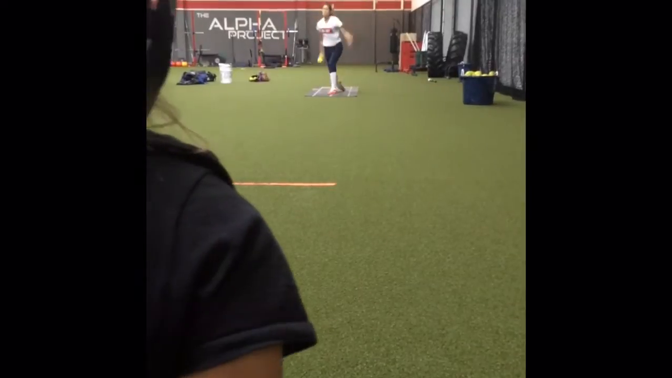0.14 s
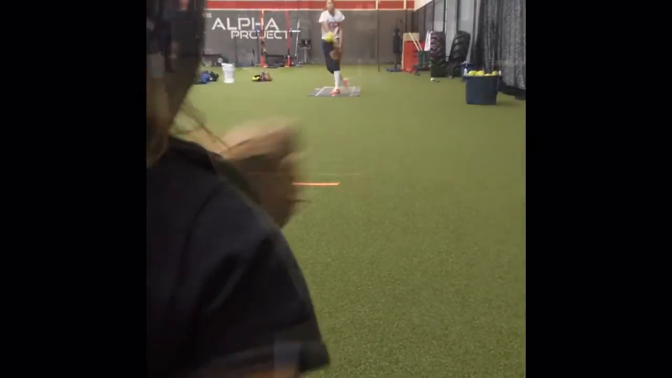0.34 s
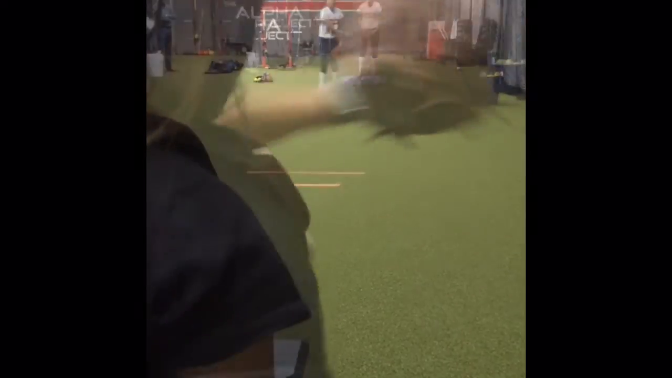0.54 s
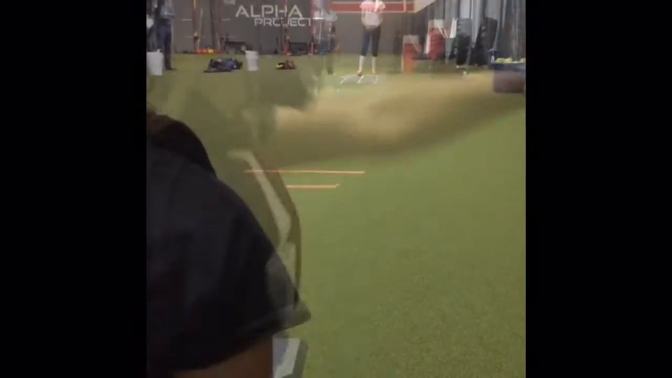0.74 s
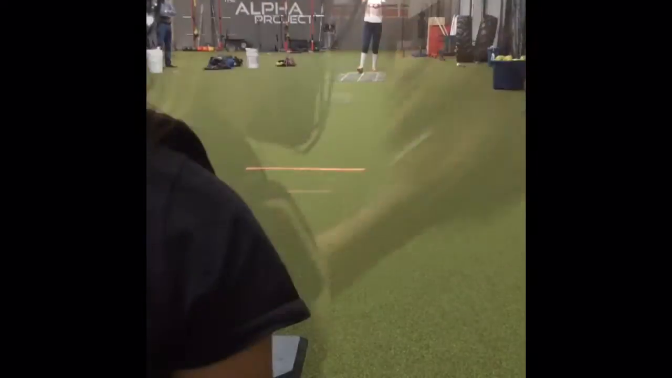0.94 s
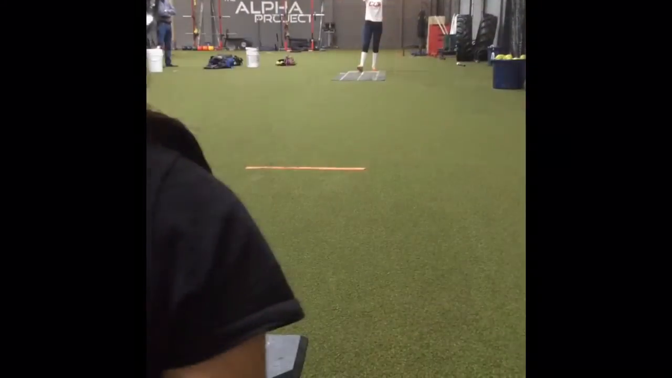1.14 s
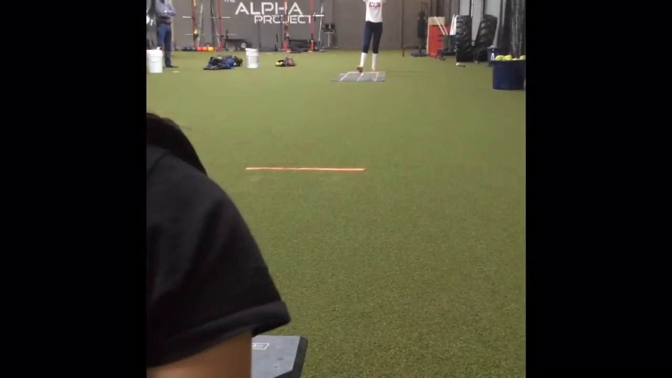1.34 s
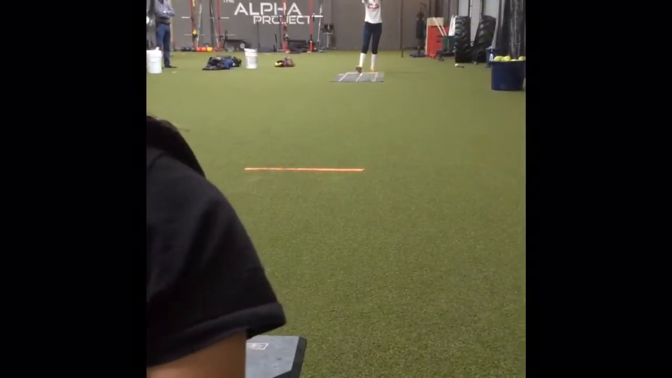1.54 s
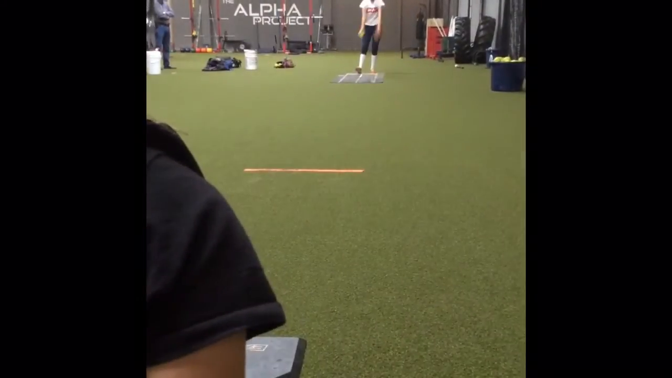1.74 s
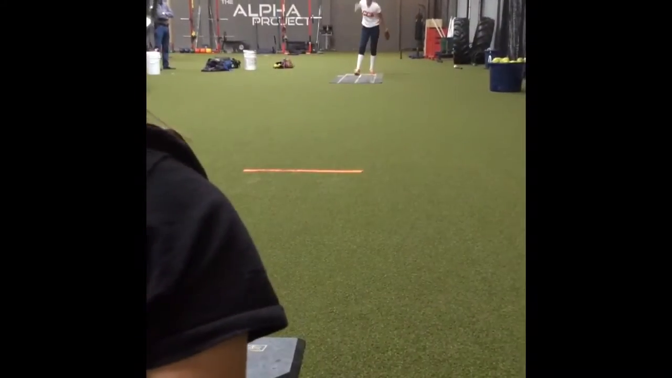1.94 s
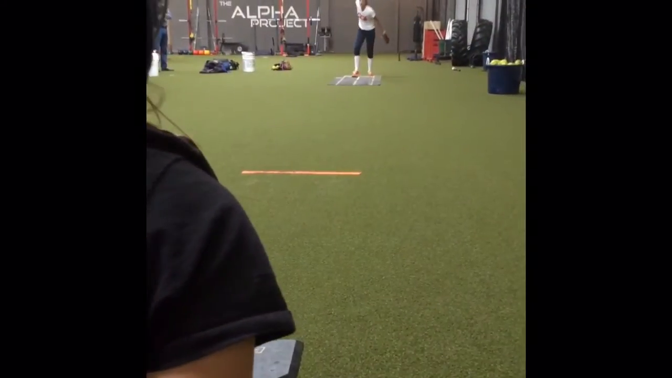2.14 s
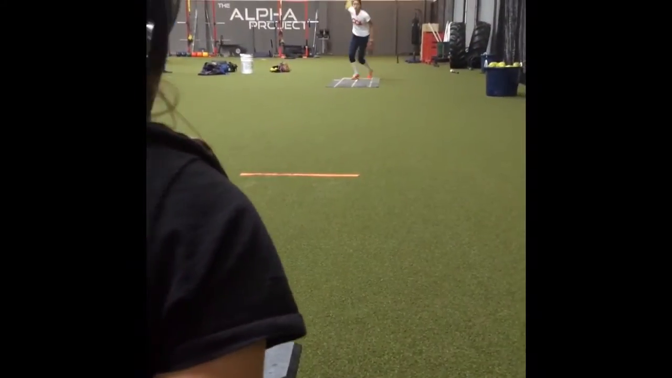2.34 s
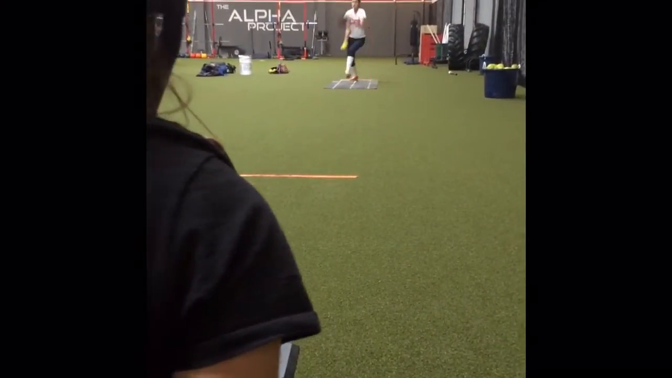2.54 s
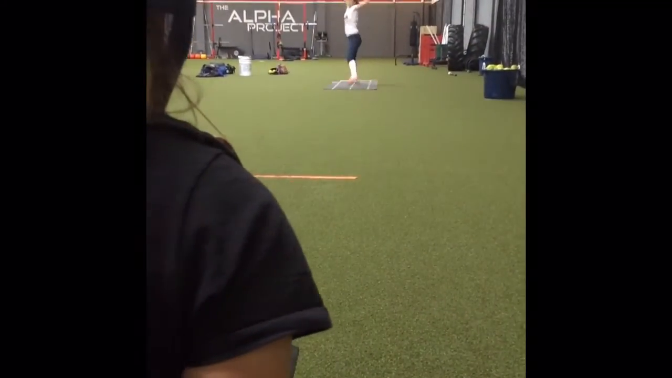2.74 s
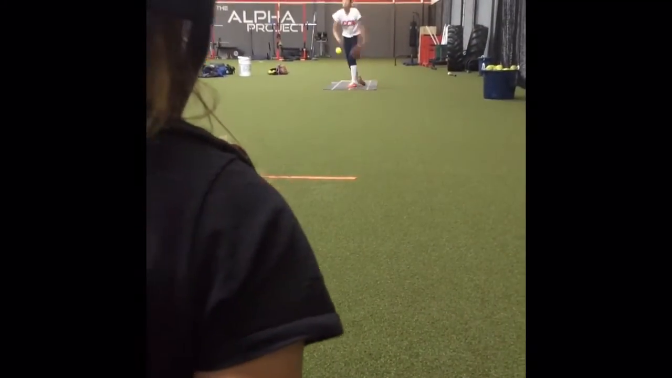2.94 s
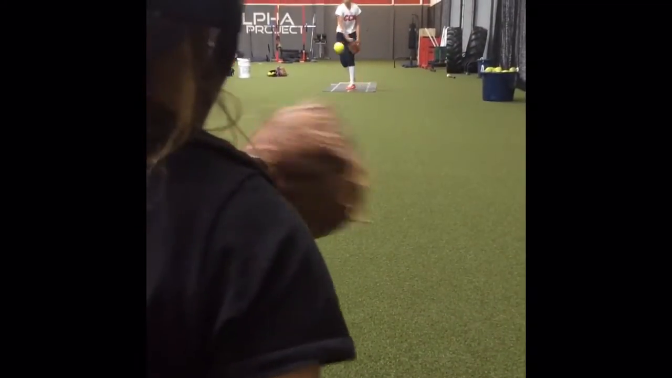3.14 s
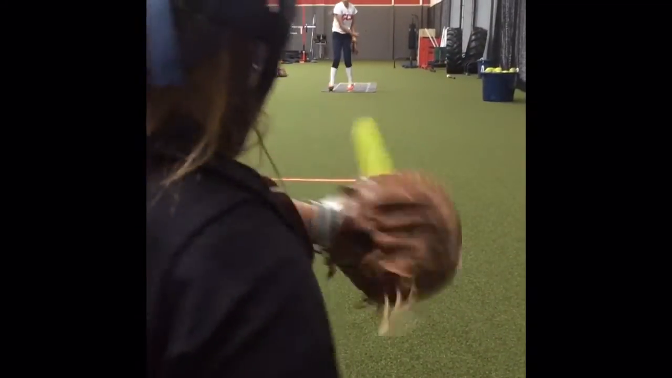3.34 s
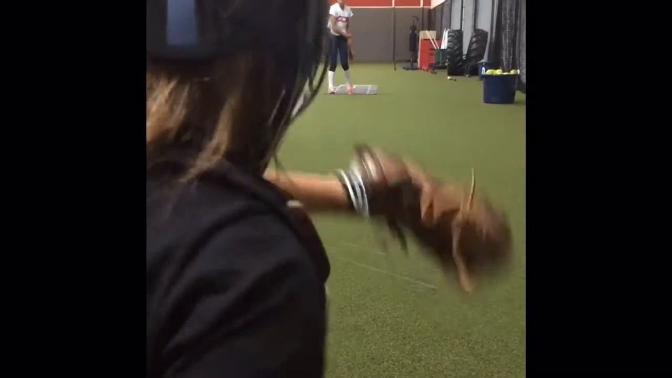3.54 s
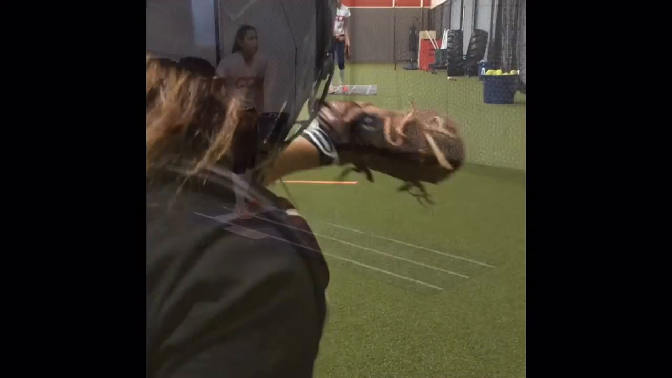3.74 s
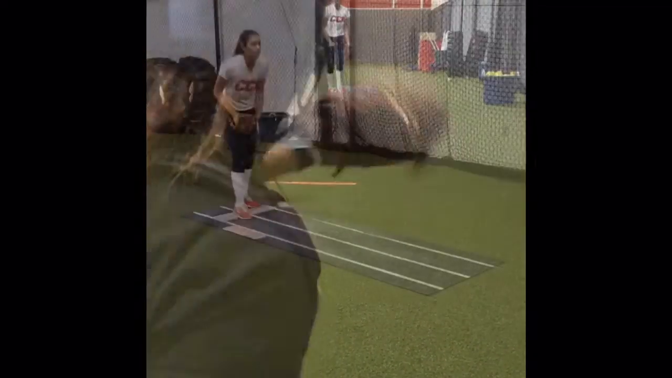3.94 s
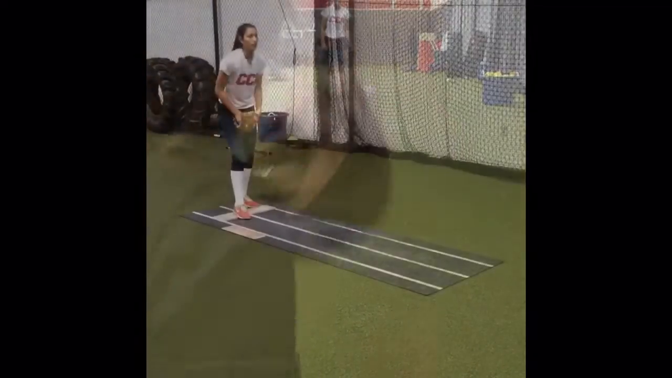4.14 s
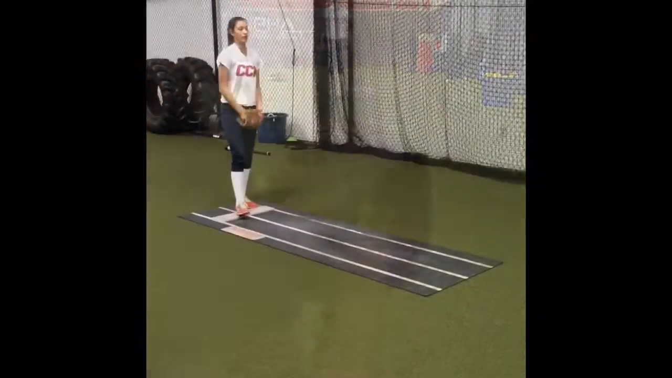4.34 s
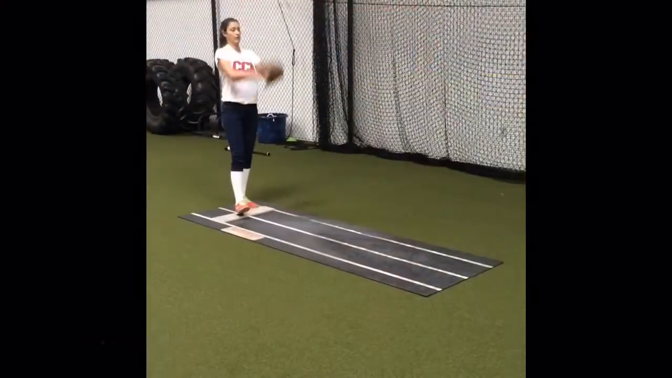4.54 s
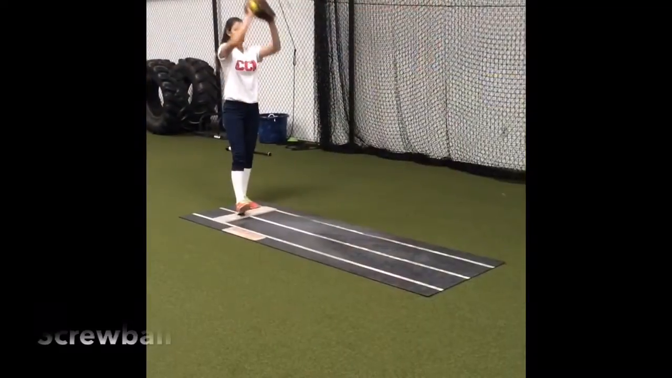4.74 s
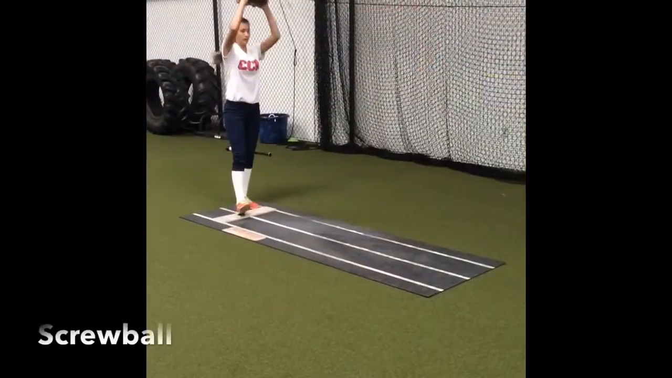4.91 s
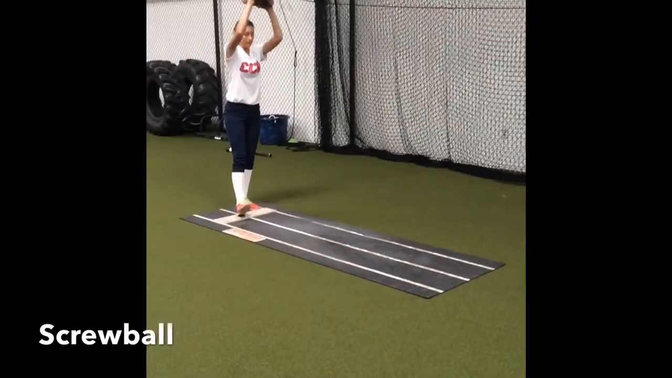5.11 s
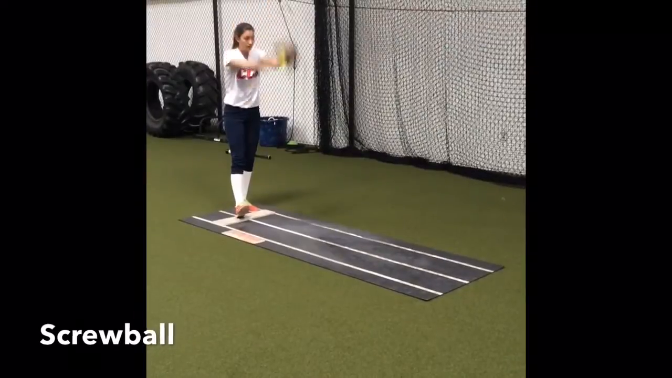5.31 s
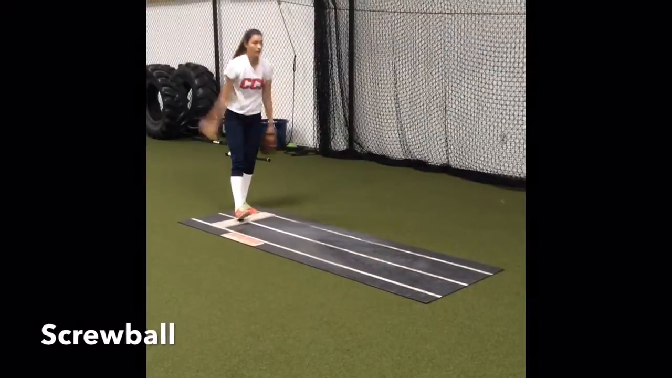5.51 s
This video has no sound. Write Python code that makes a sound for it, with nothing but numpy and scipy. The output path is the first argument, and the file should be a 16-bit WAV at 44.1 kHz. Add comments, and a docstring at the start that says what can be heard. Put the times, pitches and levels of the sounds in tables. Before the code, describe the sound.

In a big indoor hall with turf, heard from just behind the catcher, a pitcher's shoe scuffs, cloth swishes and her glove slaps her thigh far off; the ball then cracks into the close mitt. After a quiet gap of ventilation rumble the pitch repeats, with a short high squeak and a louder, brighter catch. The ringing tail fades into low droning air with soft low swells and tiny clicks.

```python
"""A softball smacks the mitt close by, ending each of two pitches in a large hall, heard from behind the catcher.
Before it the pitcher's shoe pushes, squeaks and drags on the mat, cloth swishes and her glove slaps her thigh.
Blows are damped resonances plus noise bursts, repeated by floor and walls, with a decaying noise tail.
Ventilation rumble, rush and hiss are coloured noise; cross-fades lead out of each pitch, and a drone and a
faint whine join at the end. The rumble swells briefly now and then; a few small clicks come near the end."""
import sys
import numpy as np
from scipy import signal
from scipy.fft import rfft, irfft, next_fast_len
from scipy.io import wavfile
from scipy.ndimage import uniform_filter1d, map_coordinates

SR = 44100
rng = np.random.default_rng(int(sys.argv[2]) if len(sys.argv) > 2 else 0)


def log_audio(samples):
    """Write samples as a 16-bit WAV file to the path given in sys.argv[1]."""
    # one column per channel
    frames = np.atleast_2d(samples).T
    # limit to full scale, then quantise
    limited = np.clip(frames, -1, 1)
    pcm = np.round(limited * 32767).astype(np.int16)
    wavfile.write(sys.argv[1], SR, pcm)


N = 250047


def amp(db):
    """Decibel law: the amplitude ratio of a level in dB."""
    return 10 ** (np.asarray(db) / 20)


def unit(x):
    """Power normalisation: x at rms 1."""
    return x / np.sqrt(np.mean(x ** 2) + 1e-20)


def peak(x):
    """Peak normalisation: x with its largest swing at 1."""
    return x / np.abs(x).max()


def along(points, hz):
    """Logarithmic frequency scale: each value column of the points, interpolated at hz."""
    f, *columns = np.transpose(points)
    return [np.interp(np.log(hz + 1), np.log(f + 1), column) for column in columns]


def wobble(rate):
    """Slow random modulation: a smooth curve through rate random knots a second."""
    knots = rng.standard_normal(int(N * rate / SR) + 4)
    return map_coordinates(knots, [np.arange(N) * rate / SR])


def filtered(x, response):
    """Linear filtering: the spectrum of x times a complex frequency response."""
    m = next_fast_len(len(x) + 8192)
    spectrum = rfft(x, m) * response(np.fft.rfftfreq(m, 1 / SR))
    return irfft(spectrum, m)[:len(x)]


def noise(colour, count):
    """Spectral shaping: white noise given a coloured spectrum, at rms 1."""
    white = rng.standard_normal(count)
    return unit(filtered(white, lambda hz: amp(along(colour, hz)[0])))


def add(track, s, x):
    """Superposition: mixes x into the track from time s."""
    part = track[round(s * SR):][:len(x)]
    part += x[:len(part)]


def resonances(modes, turn=-1):
    """Modal sum of causal resonances; mode k is weighted by turn ** k, and -1 fills the valleys between."""
    def response(f):
        total = 0
        for k, (centre, width, db) in enumerate(modes):
            damping = 1j * f * width
            total = total + turn ** k * amp(db) * damping / (centre * centre - f * f + damping)
        return total
    return response


def swell(s, db, rise, fall, held=0):
    """Exponential growth and decay: climbs to db at s, holds, and dies away, at steady dB a second."""
    t = np.arange(N) / SR - s
    return amp(db + rise * np.minimum(t, 0) - fall * np.maximum(t - held, 0))


def sinking_tones(rows, fall, t60, rough):
    """Damped oscillation: each tone's pitch sinks as it dies; a dull rough edge rides along."""
    track, t = np.zeros(N), np.arange(SR // 4) / SR
    for s, db, hz in rows:
        band = resonances([(hz, .35 * hz, 0)])
        edge = unit(filtered(rng.standard_normal(len(t)), lambda f: band(f) ** 2))
        tone = np.sin(2 * np.pi * (hz - fall * t / 2) * t)
        onset = 1 - np.exp(-t / 0.0048)
        add(track, s, amp(db - 60 * t / t60) * (tone + rough * edge) * onset)
    return track


# cross-fades out of each pitch: start t/s, end t/s, curve exponent (over 1 ends gently)
CROSS_FADES = [(0.91, 1.23, 0.84), (3.928, 4.55, 1.44)]


def fades():
    """Amplitude fading: gain of the outgoing shot for each cross-fade, 1 down to 0."""
    t = np.arange(N) / SR
    return [np.clip((end - t) / (end - start), 0, 1) ** curve for start, end, curve in CROSS_FADES]


def shot_powers():
    """Power conservation: the shares of the three shots, which add up to 1."""
    first, second = fades()
    return np.array([first ** 2, (1 - first ** 2) * second ** 2, 1 - second ** 2])


# the air, one row a shot: rumble level/dB, rush level/dB, hiss level/dB
SHOT_LEVELS = [(-45, -53.5, -71), (-44.5, -55.5, -73.5), (-45.5, -83, -74.5)]


def shot_gain(column):
    """Incoherent addition: the shots' levels for one layer of air mix as powers."""
    return np.sqrt(amp(SHOT_LEVELS)[:, column] ** 2 @ shot_powers())


# ventilation rumble spectrum: f/Hz, relative level/dB per Hz
RUMBLE_SPECTRUM = [(13, -66), (22, -34), (27, -23.5), (42, -15.5), (76, 1), (95, -1), (177, -19.5),
                   (200, -15.5), (260, -53), (440, -120)]
# the rumble sinks after each catch, stays low, then comes back within DIP_S
DIP_DB, DIP_IN_S, DIP_S, DIP_OUT_S = -8, .12, 0.463, 0.086


def rumble():
    """Amplitude modulation: low ventilation noise in lumps, dipping after each catch."""
    t = np.arange(N) / SR
    dip = 0
    for s, *_ in CATCH_BLOWS:
        dip = dip + np.clip(np.minimum((t - s) / DIP_IN_S, (s + DIP_S - t) / DIP_OUT_S), 0, 1)
    lumps = amp(0.5 * wobble(9.5) + 1.2 * wobble(6.3))
    return shot_gain(0) * amp(DIP_DB * dip) * unit(lumps * noise(RUMBLE_SPECTRUM, N))


# rush of air, spectrum: f/Hz, relative level/dB per Hz
RUSH_SPECTRUM = [(88, -22.5), (150, -3), (206, -11.5), (254, -3.5), (382, -13), (591, -14), (800, -18),
                 (925, -18), (3500, -41.5), (4550, -66.5), (7700, -120)]


def rush():
    """Broadband noise: a smoother rush of air whose level wanders."""
    return shot_gain(1) * amp(1.2 * wobble(6.4)) * noise(RUSH_SPECTRUM, N)


# microphone hiss spectrum: f/Hz, relative level/dB per Hz
HISS_SPECTRUM = [(1470, -30), (2500, -8.5), (3780, -2), (4300, -3.5), (5700, -4.5), (7170, -8.5),
                 (9080, -2.5), (13600, -9), (15500, -8)]


def hiss():
    """Stationary noise: the microphone's own hiss."""
    return shot_gain(2) * noise(HISS_SPECTRUM, N)


# rubber sole: t/s, level/dB, settled f/Hz, held t/s
SOLE_SQUEAKS = [(.06, -74, 12450, .06), (2.819, -48, 11480, 0.036)]
SQUEAK_RISE, SQUEAK_FALL = 5000, 130  # dB a second
OVERSHOOT_HZ, SETTLE_S = 350, .006  # starts high and settles


def squeaks():
    """Stick-slip friction: fast uneven slips smear a tone into a narrow fluttering band."""
    track = np.zeros(N)
    for s, db, hz, held in SOLE_SQUEAKS:
        slow_flutter = wobble(450) + 1j * wobble(450)
        fast_flutter = wobble(1500) + 1j * wobble(1500)
        flutter = slow_flutter + .35 * fast_flutter
        since = np.maximum(np.arange(N) / SR - s, 0)
        pitch = hz + OVERSHOOT_HZ * np.exp(-since / SETTLE_S)
        phase = 2 * np.pi * np.cumsum(pitch) / SR
        gain = swell(s, db, SQUEAK_RISE, SQUEAK_FALL, held) * amp(2.3 * wobble(150))
        track += gain * np.real(flutter * np.exp(1j * phase))
    return track


# cloth spectrum: f/Hz, relative level/dB per Hz
CLOTH_SPECTRUM = [(2350, -31), (4000, -3.5), (6740, -8.5), (8500, -0.5), (9250, -3), (12500, -3.5),
                  (15500, -15.5)]
# cloth as the arm whirls: loudest t/s, level/dB
ARM_SWISHES = [(.064, -59.5), (.255, -65), (2.416, -76), (2.708, -68), (2.82, -62.5), (3.025, -62)]
SWISH_RISE, SWISH_FALL = 590, 45  # dB a second


def swishes():
    """Friction noise: cloth swishes in fast swells that die more slowly."""
    gain = sum(swell(s, db, SWISH_RISE, SWISH_FALL) for s, db in ARM_SWISHES)
    return gain * amp(1.2 * wobble(47)) * noise(CLOTH_SPECTRUM, N)


# the pitcher's feet on the mat: t/s, level/dB, starting f/Hz
FOOT_STRIDES = [(.121, -35.5, 264), (.167, -32.5, 230), (.211, -37, 258), (2.89, -40.5, 284.4)]


def strides():
    """Impact on a soft support: dull footfalls on the mat, their pitch sinking as weight settles."""
    return sinking_tones(FOOT_STRIDES, fall=200, t60=.3, rough=.9)  # fall in Hz a second, t60 in s


# mat spectrum: f/Hz, relative level/dB per Hz
MAT_SPECTRUM = [(180, -38.5), (300, 0.5), (515, -11.5), (679, -9), (755, -24), (1050, -14.5), (1690, -23.5),
                (7000, -31), (9100, -72), (15400, -120)]
# shoe sliding on the mat: loudest t/s, level/dB
SHOE_SLIDES = [(.148, -54), (.258, -54.5), (2.48, -57), (2.909, -52.5), (3.03, -48)]
SLIDE_RISE, SLIDE_FALL = 140, 150  # dB a second


def slides():
    """Sliding friction: the dragging shoe as mat-coloured noise of uneven level."""
    gain = sum(swell(s, db, SLIDE_RISE, SLIDE_FALL) for s, db in SHOE_SLIDES)
    return gain * amp(1.6 * wobble(60)) * noise(MAT_SPECTRUM, N)


def arrivals(events, pattern):
    """Early reflections: every blow repeats the pattern of its place in the hall, dB adding to dB."""
    rows = []
    for s, crack, treble, thud, _ in events:
        for delay, c, b, d in pattern:
            rows.append((s + delay, crack + c, treble + b, thud + d))
    return rows


# leather crack resonances: f/Hz, width f/Hz, relative level/dB
LEATHER_MODES = [(1800, 1200, -17.5), (3370, 1200, 1), (5900, 2000, -4), (10500, 3500, -4)]


def blows(table, body, contact_s, lead_s, crack_s, crumple_s, crumple_db):
    """Impulse excitation: a soft push rings the body; a leather crack and a brief crumple go with it."""
    track, t = np.zeros(N), np.arange(SR // 10) / SR
    push = t * np.exp(-t / contact_s)
    thud = peak(filtered(push, resonances(body, turn=0.79)))
    shape = np.exp(-t / crack_s) + amp(crumple_db) * np.exp(-t / crumple_s)
    leather = resonances(LEATHER_MODES)
    for s, crack_db, treble_db, thud_db in table:
        def tilted(f):
            tilt = amp(treble_db * np.log2((f + 500) / 4000))
            return leather(f) * tilt / (1 + 1j * f / 11000)
        burst = filtered(rng.standard_normal(len(t)) * shape, tilted)
        add(track, s, amp(crack_db) * peak(burst))
        add(track, s - lead_s, amp(thud_db) * thud)
    return track


# glove on thigh, far off, before arrival offsets:
# t/s, crack level/dB, treble tilt/dB per octave, thud level/dB, hall tail level/dB
SLAP_BLOWS = [(.2792, -12.5, -3, -4, -19), (3.0489, -9, -2.5, -6, -17)]
# a weak first touch, the blow, then floor and walls, offsets added to each slap:
# delay t/s, crack level/dB, treble tilt/dB per octave, thud level/dB
SLAP_PATTERN = [(-.0052, -15, -4.5, -4.5), (0, 3, -2, 0), (.0056, 0.5, -2.5, -9), (.0131, -5.5, 3.5, -26),
                (.0189, -9, 3, -25), (.0250, -7, -2.5, -3), (.0317, -16.5, -3, -10),
                (.0421, -10.5, -1, -12)]
# thigh thud resonances: f/Hz, width f/Hz, relative level/dB
THIGH_MODES = [(215, 25, 2.5), (385, 118, -5), (560, 89, 1), (704, 49, -8)]


def slaps():
    """Modal response of a soft body: the glove slaps the thigh and the hall returns the blow."""
    return blows(arrivals(SLAP_BLOWS, SLAP_PATTERN), THIGH_MODES, contact_s=0.00051, lead_s=0.00028,
                 crack_s=.0004, crumple_s=0.0043, crumple_db=-17.5)


# hall decay: f/Hz, early t60 t/s, late t60 t/s, late share level/dB
HALL_DECAY = [(100, 0.53, 2, -4.5), (260, .5, 2.7, -7.5), (700, 0.42, 2.2, -4), (1100, 0.45, 2.21, -3),
              (1820, 0.96, 2.32, -8), (3037, 0.49, 1.47, -4.5), (4370, 0.55, 1.25, -8),
              (6000, .33, 0.89, -13), (8560, 0.39, 0.65, -17), (11090, 0.265, 0.54, -22),
              (15020, .18, 0.43, -23)]
# tail spectra after slap, catch, slap, catch: f/Hz, relative level/dB per Hz
TAIL_COLOURS = [
    [(35, -60), (60, -32.5), (210, 0.5), (327, -4.5), (376, -4.5), (486, -12), (572, -7), (721, -18.5),
     (1070, -15.5), (1150, -20), (2410, -26.5), (9970, -39), (15500, -50)],
    [(35, -62), (60, -34), (102, -17.5), (142, -16), (231, -26), (285, -10.5), (423, -3.5), (509, -11),
     (953, -13.5), (2250, -30.5), (4030, -28.5), (8470, -35.5), (15500, -41)],
    [(35, -54), (60, -24), (135, -16.5), (226, -4), (335, -10.5), (403, -7), (486, -16.5), (572, -10),
     (688, -20), (931, -19), (4420, -30.5), (11500, -39.5), (15500, -57)],
    [(35, -60.5), (60, -25.5), (231, -9), (291, -3.5), (385, -1), (464, -5), (627, -11.5), (738, -9.5),
     (889, -7), (1520, -18.5), (2980, -19.5), (9740, -28), (15500, -33)],
]
# delay s, build-up s, time held by strong wall returns s
SLAP_TAIL, CATCH_TAIL = (-.004, 0.0048, 0.03), (0.00033, 0.012, .047)


def tails(patchy_db):
    """Reverberation: quick early decay over a slower late one, in uneven patches, fading with each pitch."""
    track = np.zeros(N)
    answers = []
    for events, (delay, build, hold) in [(SLAP_BLOWS, SLAP_TAIL), (CATCH_BLOWS, CATCH_TAIL)]:
        answers += [(s + delay, db, build, hold) for s, *_, db in events]
    pitch_fades = np.repeat(fades(), 2, axis=0)  # slap and catch share one fade
    for (s, db, build, hold), colour, fade in zip(sorted(answers), TAIL_COLOURS, pitch_fades):
        hz, t, z = signal.stft(noise(colour, 2 * SR), SR, nperseg=512)
        early, late, late_db = (column[:, None] for column in along(HALL_DECAY, hz))
        since = np.maximum(t - hold, 0)
        decay = np.hypot(amp(-60 * since / early), amp(late_db - 60 * since / late))
        patches = uniform_filter1d(rng.standard_normal(z.shape), size=2, axis=0)
        patches = unit(uniform_filter1d(patches, size=14, axis=1))
        tail = signal.istft(z * decay * amp(patchy_db * patches), SR, nperseg=512)[1][:2 * SR]
        # returns thicken as farther walls answer
        onset = (1 - np.exp(-np.arange(len(tail)) / SR / build)) ** 2
        add(track, s, amp(db) * tail * onset * fade[round(s * SR):][:2 * SR])
    return track


# ball in the mitt, before arrival offsets:
# t/s, crack level/dB, treble tilt/dB per octave, thud level/dB, hall tail level/dB
CATCH_BLOWS = [(.6704, -14.5, -2, -6.5, -27.5), (3.4389, -4.5, 2, 0, -20.5)]
# the blow, the ball seating in the pocket, then floor and walls, offsets added to each catch:
# delay t/s, crack level/dB, treble tilt/dB per octave, thud level/dB
CATCH_PATTERN = [(0, -1, -2, 1.5), (.0016, -20, -0.5, -4.5), (.0062, -24, -0.5, -13.5),
                 (.0159, -6.5, -2, -15), (.0318, -11.5, 5, -20.5)]
# mitt thud resonances: f/Hz, width f/Hz, relative level/dB
MITT_MODES = [(100.7, 67, -13), (190, 250, -12), (370, 170, -1.5), (660, 170, -2), (990, 250, -4.5)]


def catches():
    """Impact polarity: the ball drives the mitt, whose first swing seen from behind is a suction."""
    return -blows(arrivals(CATCH_BLOWS, CATCH_PATTERN), MITT_MODES, contact_s=0.00015, lead_s=-0.00014,
                  crack_s=0.000069, crumple_s=0.0028, crumple_db=-14.5)


# brief low swells of the ventilation rumble: t/s, level/dB, starting f/Hz
RUMBLE_SWELLS = [(1.14, -30, 78), (2.71, -32.5, 82.5), (3.985, -23, 69.9), (4.07, -26.5, 75),
                 (4.60, -28, 80), (4.71, -22.5, 69.8), (4.826, -24, 72), (5.046, -28.5, 80)]


def rumble_swells():
    """Narrow-band fluctuation: brief low swells of the ventilation rumble, as decaying tones."""
    return sinking_tones(RUMBLE_SWELLS, fall=65, t60=0.12, rough=0.1)  # fall in Hz a second, t60 in s


# drone spectrum: f/Hz, relative level/dB per Hz
DRONE_SPECTRUM = [(76, -26.5), (130, -2.5), (162, -24), (199, -9), (274, -17.5), (351, -18), (481, -27.5),
                  (608, -24), (907, -28), (1180, -27.5), (3500, -52.5), (4550, -82), (7700, -120)]


def drone():
    """Coloured noise: a wandering drone of air in the last shot only."""
    return np.sqrt(shot_powers()[2]) * amp(-52.5 + 0.93 * wobble(6.5)) * noise(DRONE_SPECTRUM, N)


WHINE_HZ, WHINE_DB = 6000, -87


def whine():
    """Phase modulation: a very faint, slightly unsteady sine in the last shot only."""
    phase = 2 * np.pi * WHINE_HZ * np.arange(N) / SR + .3 * wobble(30)
    return np.sqrt(shot_powers()[2]) * amp(WHINE_DB) * np.sin(phase)


# small clicks nearby: t/s, peak level/dB
CLICKS = [(4.316, -56), (4.342, -53), (4.841, -50)]


def ticks():
    """Transient excitation: very short noise bursts through the leather resonances make dry clicks."""
    track, t = np.zeros(N), np.arange(300) / SR
    for s, db in CLICKS:
        burst = rng.standard_normal(len(t)) * np.exp(-t / 0.00074)
        add(track, s, amp(db) * peak(filtered(burst, resonances(LEATHER_MODES))))
    return track


def scene():
    """Superposition of the hall's air, the feet and cloth, the blows and their tails, and the clicks."""
    air = rumble() + rush() + hiss() + rumble_swells() + drone() + whine()
    feet_and_cloth = squeaks() + swishes() + strides() + slides()
    hits = slaps() + tails(patchy_db=1.5) + catches()
    return (air + feet_and_cloth + hits + ticks())[None]


LOW_HZ, TOP_HZ = 35, 15500  # microphone's bass corner and the band limit


def record(dry):
    """Saturation and band limiting: peaks round off, deepest bass drops, nothing stays above the limit."""
    soft = dry[0] / (1 + np.abs(dry[0] / .93) ** 6) ** (1 / 6)

    def response(hz):
        bass_cut = 1j * hz / (LOW_HZ + 1j * hz)
        treble_cut = (hz < TOP_HZ) / np.sqrt(1 + (hz / 15200) ** 60)
        return bass_cut * treble_cut
    return filtered(soft, response)[None]


dry = scene()
out = record(dry)
log_audio(out)
```